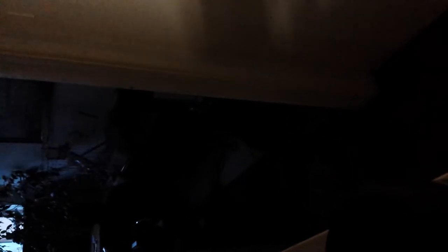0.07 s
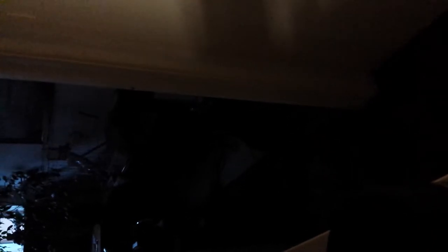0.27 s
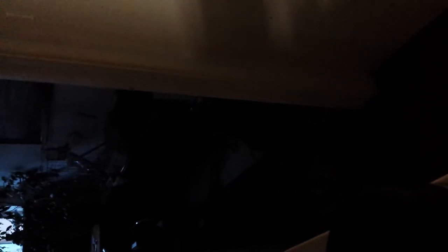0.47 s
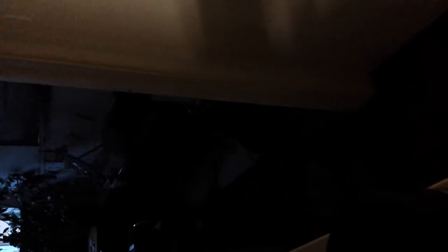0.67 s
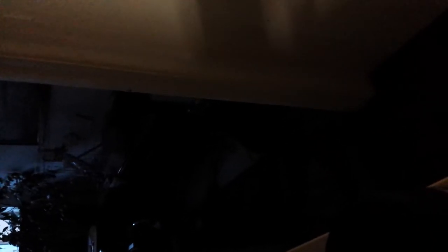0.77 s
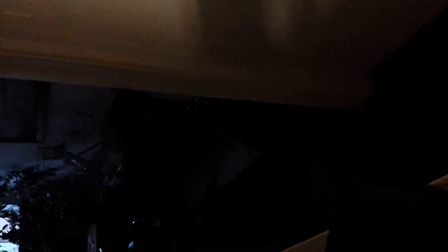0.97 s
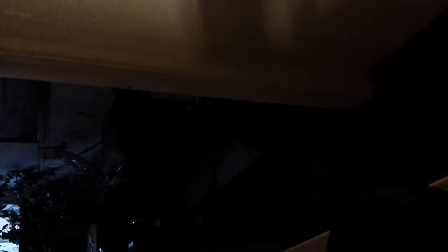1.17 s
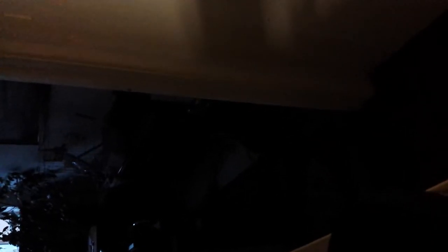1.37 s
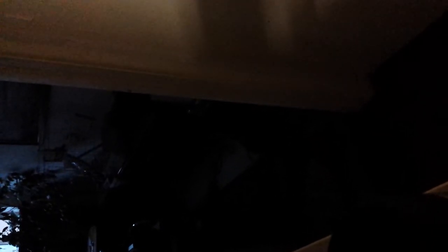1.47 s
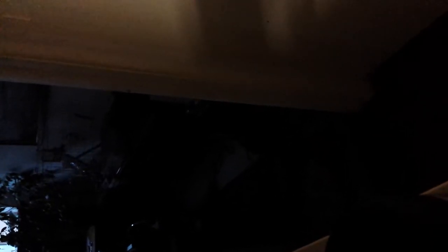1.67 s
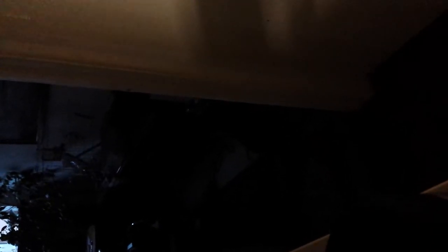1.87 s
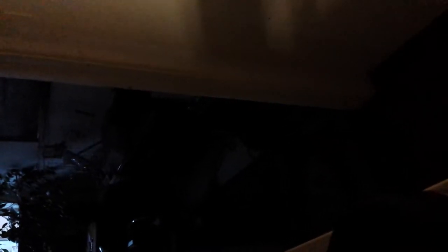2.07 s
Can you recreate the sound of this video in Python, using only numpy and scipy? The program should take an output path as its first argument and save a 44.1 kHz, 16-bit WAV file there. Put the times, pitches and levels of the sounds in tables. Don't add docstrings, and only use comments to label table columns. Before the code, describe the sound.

Dog whimpering in a quiet room: brief rough yelp, faint high whistling, then a drawn-out cry

```python
import sys
import numpy as np
from scipy import signal
from scipy.fft import rfft, irfft, next_fast_len
from scipy.io import wavfile
from scipy.ndimage import uniform_filter1d

SR = 44100
rng = np.random.default_rng(int(sys.argv[2]) if len(sys.argv) > 2 else 0)


def boost_factor(decibels):
    exponent = np.asarray(decibels, float) / 20
    return 10 ** exponent


def dump(signal):
    limited = np.clip(np.atleast_2d(signal).T, -1, 1)
    pcm = np.round(limited * 32767).astype(np.int16)
    wavfile.write(sys.argv[1], SR, pcm)


N = 93227


def rms_one(x):
    return x / np.sqrt(np.mean(x ** 2) + 1e-20)


def in_time(rows):
    s, *columns = np.transpose(rows)
    return [np.interp(np.arange(N) / SR, s, column) for column in columns]


def at_hz(points, hz):
    point_hz, point_db = np.transpose(points)
    return np.interp(np.log(hz), np.log(point_hz), point_db)


def drift(rate_hz):
    r = np.exp(-2 * np.pi * rate_hz / SR)
    noise = rng.standard_normal(N + SR)
    return rms_one(signal.lfilter([1], [1, -2 * r, r * r], noise)[SR:])


def resonate(x, hz, width_hz):
    r = np.exp(-np.pi * width_hz / SR)
    poles = [1, -2 * r * np.cos(2 * np.pi * hz / SR), r * r]
    return signal.lfilter([(1 - r * r) / 2, 0, (r * r - 1) / 2], poles, x)


def rings(table):
    out = np.zeros(N)
    for hz, width_hz, db in table:
        once = resonate(rng.standard_normal(N), hz, width_hz)
        out += boost_factor(db) * rms_one(resonate(once, hz, width_hz))
    return out


def background():
    # (time [s], level [dB])
    opening = [(0.0, -82), (0.1, -84.5), (0.18, -75), (0.26, -73), (0.32, -80.5), (0.45, -80),
               (0.49, -76.5), (0.56, -78), (0.96, -76.5), (1.13, -72), (1.24, -77), (1.52, -68),
               (2.03, -70), (2.11, -70.5)]
    # (frequency [Hz], spectral level [dB])
    floor = [(15, -66), (25, 2.5), (508, -7), (1080, -13), (1750, -12), (2000, -11), (2170, -13),
             (5280, -11.5), (15500, -20)]
    # (frequency [Hz], width [Hz], level above hiss [dB])
    hum_bands = [(48.8, 60, -9), (106.3, 31, -1), (199, 3.6, -0.5), (346.4, 24, -9)]
    hz = np.maximum(np.fft.rfftfreq(N, 1 / SR), 1)
    mid, side = rfft(rng.standard_normal((2, N)))
    alike = 0.58 / (1 + (hz / 650) ** 2)
    both = np.sqrt(1 + alike) * mid + np.sqrt(1 - alike) * side * [[1], [-1]]
    hiss = boost_factor(11) * rms_one(irfft(both * boost_factor(at_hz(floor, hz)), N))
    white = irfft(both, N)
    hum = np.zeros((2, N))
    for hum_hz, width_hz, db in hum_bands:
        once = resonate(white, hum_hz, width_hz)
        hum += boost_factor(db) * rms_one(resonate(once, hum_hz, width_hz))
    return boost_factor(in_time(opening)[0]) * (hiss + hum)


def bumps():
    # (time [s], level [dB], length [s])
    touches = [
        (1.155, -64.5, 0.031),
        (1.921, -70.5, 0.093),
        (2.058, -62.5, 0.074),
    ]
    swell = np.zeros(N)
    for s, db, length_s in touches:
        swell += boost_factor(db) * np.exp(-((np.arange(N) / SR - s) / length_s) ** 2)
    noise = rng.standard_normal((2, N)) + rng.standard_normal(N)
    return swell * rms_one(resonate(noise, 89, 107))


def ticks():
    # (time [s], peak level [dB], frequency [Hz], width [Hz])
    contacts = [
        (.893, -44, 1480, 2390),
        (1.157, -41, 1300, 2500),
        (1.796, -47.5, 7100, 4930),
    ]
    out = np.zeros(N)
    for s, db, hz, width_hz in contacts:
        click = resonate(np.arange(N) == int(s * SR), hz, width_hz)
        out += boost_factor(db) * click / click.max()
    return out


def whistle(phase, voice_db, hoarse, open_db):
    # (time [s], frequency [Hz], level [dB])
    early = [(0.326, 5150, -97), (0.351, 5260, -70), (0.391, 5420, -95), (0.449, 5490, -85),
             (0.474, 5480, -70), (0.509, 5433, -63.5), (0.531, 5407, -69.5), (.6, 5390, -78),
             (.66, 5340, -77),
             (0.701, 5380, -75), (.745, 5340, -66.5), (.775, 5300, -79.5), (0.901, 5290, -76.5),
              (0.991, 5290, -76.5), (1.055, 5250, -57.5), (1.136, 5220, -54), (1.185, 5225, -74),
              (1.288, 5190, -72)]
    # (time [s], frequency [Hz], level [dB])
    late = [(1.317, 5090, -62), (1.365, 5098, -44.5), (1.457, 5092, -45.5), (1.481, 4845, -49),
            (1.518, 4720, -44.5), (1.561, 4643, -56.5), (1.62, 4620, -57), (1.702, 4485, -57),
            (1.744, 4470, -78)]
    # (time [s], frequency [Hz], level [dB])
    tail = [(1.78, 4560, -77), (1.87, 4780, -74), (2.02, 4830, -73), (2.07, 4850, -86)]
    # (frequency [Hz], width [Hz], level [dB])
    nose = [(588, 55, -4), (1710, 200, -7), (2640, 133, -9), (4630, 1300, 2.5)]
    hz, level_db = in_time([(.25, 5200, -110)] + early + late + tail)
    voiced = np.clip((voice_db + 79) / 25, 0, 1)
    faint = np.clip((-57.5 - level_db) / 10, 0, 1)
    falling = np.clip(-np.gradient(hz) * SR / 4000, 0, 1)
    wobble = 0.00082 + .002 * faint + .011 * voiced * uniform_filter1d(falling, size=2000)
    shake = wobble * drift(95)
    rough = 1 + voiced * (.04 * np.cos(phase) + .4 * hoarse ** 2 * drift(300))
    tone = np.sin(2 * np.pi * np.cumsum(hz * (1 + shake)) / SR) * rough
    flutter_db = 2.5 * drift(45)
    air = boost_factor(-70.5 + 0.28 * (level_db + 53)) * rings(nose)
    return np.sqrt(2) * boost_factor(level_db + flutter_db) * tone, air


def throat_controls():
    # (time [s], pitch [Hz], level [dB], hoarseness [0-1], mouth opening [dB])
    whimper = [
        (.11, 470, -94, 0, -22),
        (.128, 434.3, -53, 0.3, -13),
        (.145, 399, -48, 0.34, -5.5),
        (.17, 397, -38.5, 0, 0.5),
        (.182, 468.8, -56.5, 0.72, -4),
        (.21, 484.8, -48, 1, -8),
        (.25, 450.7, -57.5, 0.76, -10),
        (.285, 420.4, -71, 1, 3.5),
    ]
    # (time [s], pitch [Hz], level [dB], hoarseness [0-1], mouth opening [dB])
    cry_start = [
        (1.382, 479.2, -66, 0.07, 2),
        (1.405, 495.2, -37.5, 0.31, 0),
        (1.433, 497.7, -34, .6, -1),
        (1.477, 503.7, -53, 1.23, 3),
        (1.505, 487, -50.5, 0.3, 5),
        (1.524, 440.7, -45.5, 0.77, -2.5),
        (1.561, 435, -43.5, 0.31, 10),
        (1.598, 440.6, -42, 0.42, 2),
        (1.627, 433.3, -56.5, 0.67, 7),
    ]
    # (time [s], pitch [Hz], level [dB], hoarseness [0-1], mouth opening [dB])
    cry_body = [
        (1.638, 480.8, -36, 0.18, -7),
        (1.674, 472.3, -43.5, 0, 12),
        (1.698, 484, -29.5, 0.09, -8),
        (1.72, 510, -37, 0.04, -2),
        (1.8, 520, -42, 0.02, 4),
        (1.89, 533.4, -42, .01, 3),
        (1.99, 540.5, -41, 0, 0.5),
        (2.048, 550.3, -47.5, 0.03, 5.5),
        (2.114, 562, -60.5, 0.05, 11),
    ]
    between = [(.33, 388.3, -110, 0.69, 0), (1.36, 485, -110, 0.25, 0)]
    hz, level_db, hoarse, open_db = in_time(whimper + between + cry_start + cry_body)
    phase = 2 * np.pi * np.cumsum(hz * (1 + 0.00293 * drift(27))) / SR
    return phase, level_db, np.clip(hoarse, 0, 1), open_db


def voice(phase, level_db, hoarse, open_db):
    # (frequency [Hz], gain [dB])
    throat = [(330, -22.5), (410, -2), (600, 4.5), (800, -18.5), (1130, -32.5), (1600, -14.5),
              (2250, -24.5), (2640, -20.5)]
    # (time [s], half width [s])
    nulls = [(1.669, 0.017), (1.717, 0.0049), (1.743, 0.0068), (1.807, 0.013), (1.904, .01)]
    # (frequency [Hz], width [Hz], level [dB])
    mouth = [(680, 420, 3), (1672, 77, 3.5), (2070, 420, 8), (2670, 190, -2), (3595, 220, 1)]
    growl_hz = 92.14 * (1 + 0.11 * drift(21.5))
    growl = 0.73 * np.cos(2 * np.pi * np.cumsum(growl_hz) / SR)
    cancel = np.prod([np.tanh((np.arange(N) / SR - s) / width_s) for s, width_s in nulls], axis=0)
    clear = np.clip(1 - hoarse / .1, 0, 1)
    out = np.zeros((2, N))
    for k in range(1, 9):
        rasp = boost_factor(-2.5 + 4 * (k > 1)) * (drift(124) + 1j * drift(124))
        if k == 1:
            gain = cancel
        else:
            closing_db = -13 * np.sqrt(max(k - 3, 0)) * clear
            gain = boost_factor(open_db + 2.5 * drift(19.5) + closing_db)
        sidebands = hoarse ** min(k, 2) * (growl + rasp)
        out[int(k > 1)] += gain * np.imag(np.exp(1j * k * phase) * (1 + sidebands))
    out = np.sqrt(2) * boost_factor(level_db) * out / np.sqrt(1 + hoarse ** 2)
    colour = throat + [(3076, throat[-1][1] - 18)]
    size = next_fast_len(N + SR // 4)
    hz = np.maximum(np.fft.rfftfreq(size, 1 / SR), 1)
    low, over = irfft(rfft(out, size) * boost_factor(at_hz(colour, hz)), size)[:, :N]
    breath = boost_factor(-22.5 + level_db + open_db) * hoarse * (1 + growl) * rings(mouth)
    return low, over + breath


def place(x, pan_db):
    lag = int(0.000385 * SR)
    late = np.concatenate([np.zeros(lag), x])[:N]
    return np.array([late * boost_factor(pan_db / 2), x * boost_factor(-pan_db / 2)])


def room(x, wet_db):
    t60_s, wall_cut_hz = 0.38, 17600
    size = next_fast_len(N + SR)
    w = 2 * np.pi * np.fft.rfftfreq(size)
    dull = 1 / (1 + 1j * w * SR / (2 * np.pi * wall_cut_hz))
    out = np.zeros((2, len(w)), complex)
    for k, lag in enumerate(rng.uniform(.012, .045, 16) * SR):
        loop = boost_factor(-60 * lag / SR / t60_s) * dull * np.exp(-1j * w * lag)
        out[k % 2] += loop / (1 - loop) * (-1) ** (k // 2)
    return boost_factor(wet_db) * irfft(out * rfft(x, size), size)[:, :N]


def scene():
    controls = throat_controls()
    low, over = voice(*controls)
    high, air = whistle(*controls)
    dog = place(low, -2) + place(over + air, 6) + place(high, 10)
    walls = room(low, -18) + room(over + air, -11) + room(high, -11)
    return dog + walls + ticks() + background() + bumps()


def roll_off(x):
    return signal.sosfilt(signal.butter(12, 15630, fs=SR, output="sos"), x)


def record(dry):
    band = signal.butter(2, [68, 19000], "band", fs=SR, output="sos")
    mix = signal.sosfilt(band, dry)
    return roll_off(mix)


dry = scene()
out = record(dry)
dump(out)
```